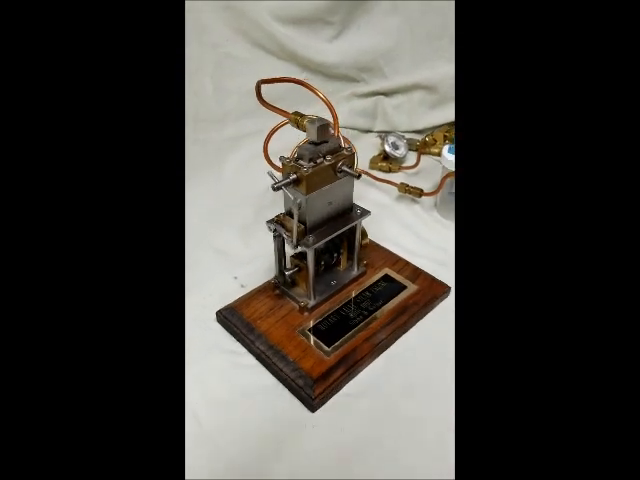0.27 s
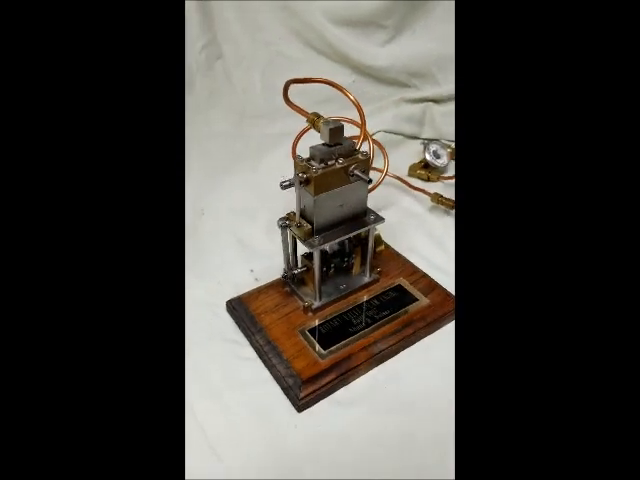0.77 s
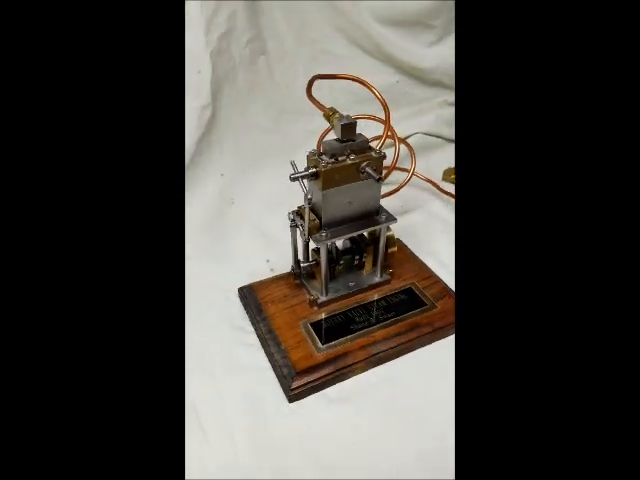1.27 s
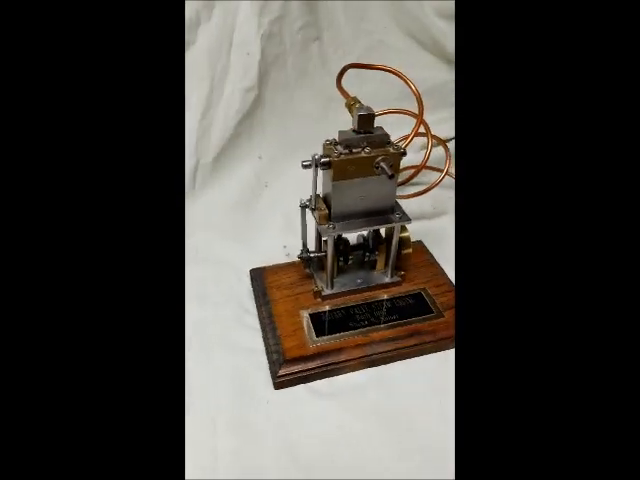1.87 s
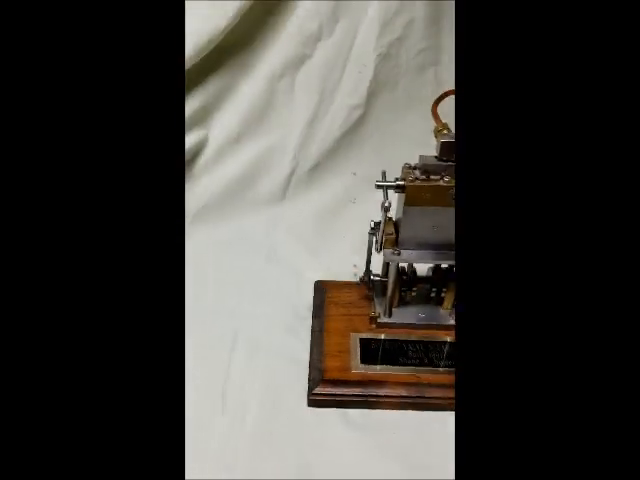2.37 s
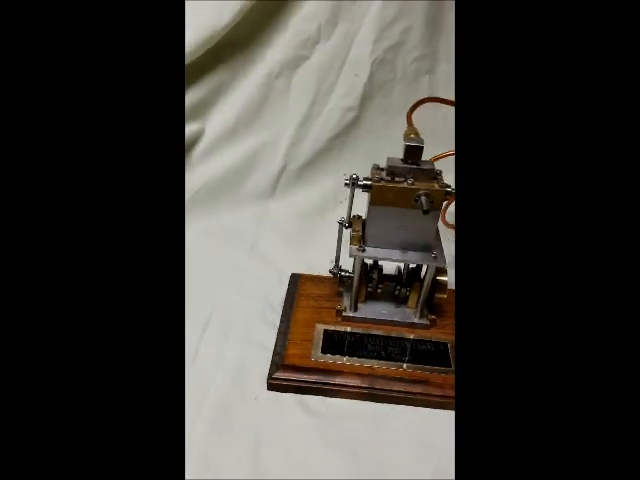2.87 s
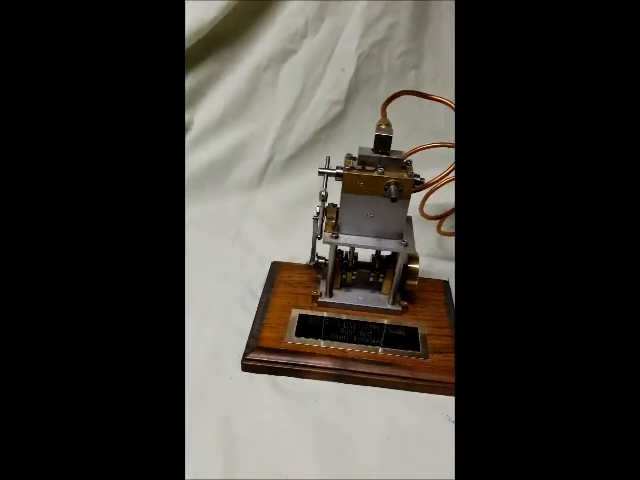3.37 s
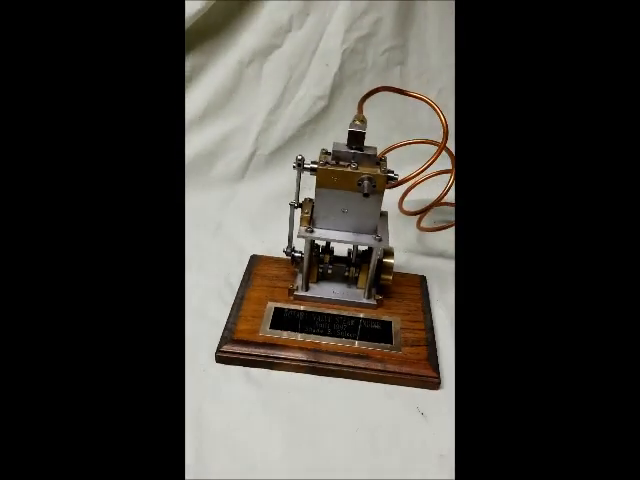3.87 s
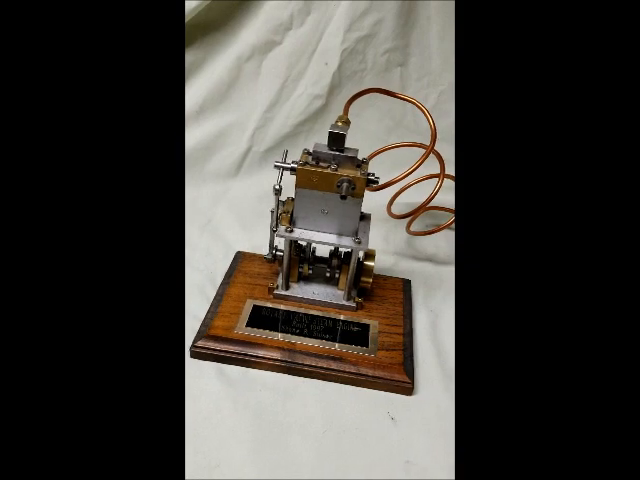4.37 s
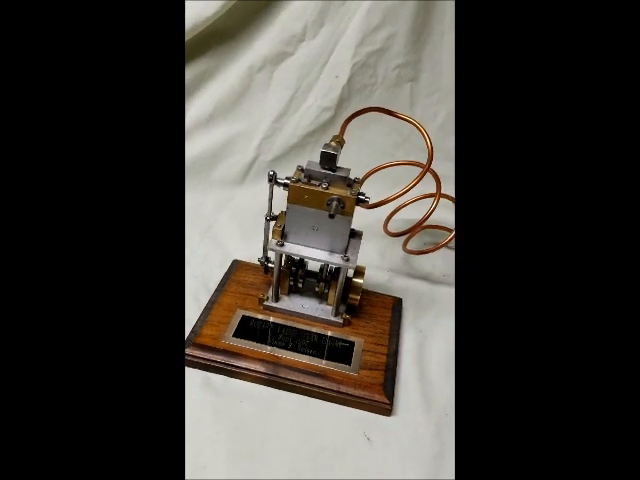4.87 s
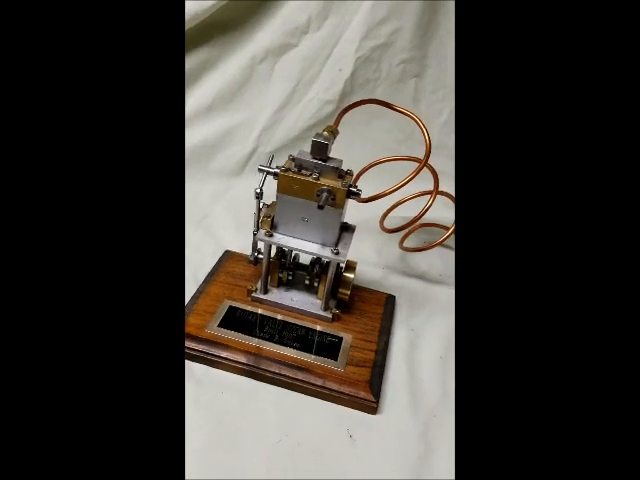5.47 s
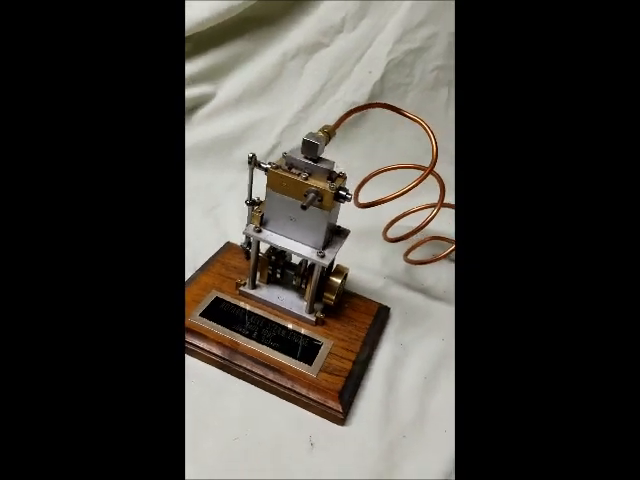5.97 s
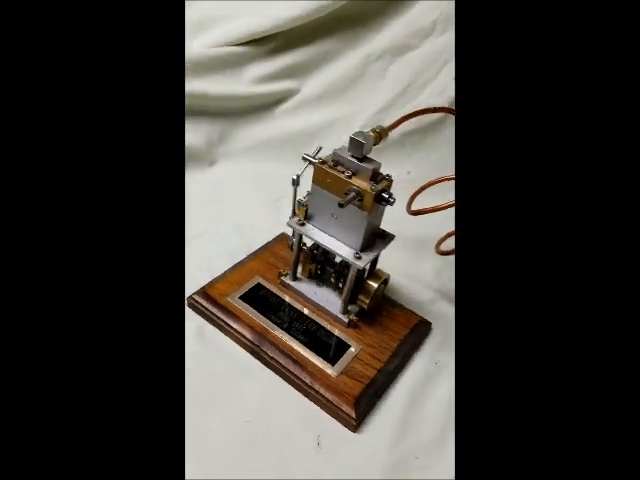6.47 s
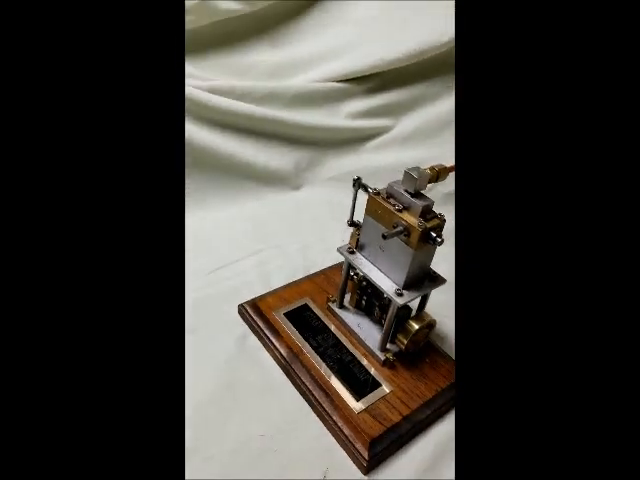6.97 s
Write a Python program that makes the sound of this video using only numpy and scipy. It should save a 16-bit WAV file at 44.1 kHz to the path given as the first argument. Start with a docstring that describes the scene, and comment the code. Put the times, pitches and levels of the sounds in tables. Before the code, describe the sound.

From 0 to about 7 seconds a small twin-cylinder compressed-air engine is already running and never stops, turning evenly about nine times a second with only tiny drift. Each turn starts with a hard knock ringing the metal frame and wooden base, then a short airy puff, a crisp double tick from the linkage, and another puff with a brief wavering whistle near 3 kHz. The base buzzes roughly after each knock. Loose pins rattle, air leaks softly, and a compressor hums faintly near 59 Hz. The phone circles closely: around 1.5-3 seconds very high, piercing jet hiss swells, strongest to the left; from about 3 seconds it recedes and knocks and ticks grow clearer, more central or rightward, through 6 seconds. At 6.4 seconds there is one very short scrape. The room is small and dry, with a short dull tail.

```python
"""A small twin-cylinder air engine turns nine times a second on a wooden base while a phone moves slowly around it.
Throughout, air leaks, loose pins rattle and a compressor motor hums further off.
Each turn starts with a knock that rings frame, base and table; then the second cylinder puffs a jet of noise
with pipe notes, the linkage ticks, and the first cylinder puffs with a short whistle.
Near 6.4 s something scrapes once, as a burst of resonant noise."""
import sys
import numpy as np
from scipy import signal
from scipy.fft import rfft, irfft, next_fast_len
from scipy.io import wavfile
from scipy.ndimage import uniform_filter1d

SR = 44100
rng = np.random.default_rng(int(sys.argv[2]) if len(sys.argv) > 2 else 0)


def undo_db(level):
    """Turn decibels back into plain size, where 20 dB means ten times bigger."""
    steps = np.asarray(level, float) / 20
    return 10 ** steps


def output_pcm(signal):
    """Save a mono or channel-first signal as 16-bit PCM at the path in sys.argv[1].

    Samples are clipped to [-1, 1] before scaling.
    """
    pcm = np.clip(np.atleast_2d(signal).T, -1, 1) * 32767
    wavfile.write(sys.argv[1], SR, np.round(pcm).astype(np.int16))


N = 317961
T = np.arange(N) / SR

# The phone's path. Each row: time in seconds, bearing from the engine's front in degrees,
# bass swell near the table in dB, delay of shared noise at the right port in ms.
PHONE = [(0, -50, 0, .2), (1.2, -33, -1.3, .15), (2.2, -19, -1.2, .5), (3.2, -5, -1, .48),
         (5, 20, -.5, .45), (6, 34, .5, .34), (7.2, 51, 2, .2)]
BEARING = np.interp(T, *np.transpose(PHONE)[:2])
# The lobe in which each part sends out its sound. Each entry: level outside the lobe in dB,
# change inside in dB, aim in degrees, half width in degrees, edge steepness (exponent).
LOBES = {"jet": (-26.3, 4.6, -21.5, 11.3, 12), "jet core": (-42, 15, -21.5, 11.3, 12),
         "upper note": (-33.5, 7, 5, 19, 3), "lower note": (-37, 5, 18, 34, 4), "ping": (-40, 8, -30, 9, 3),
         "mid hiss": (-44, -5, 7, 17, 3), "second hiss": (-2.5, -2.5, 25, 55, 4),
         "second notes": (-3.5, -6, -6, 36, 4), "knock": (-34, 11, 25, 42, 4),
         "tick": (-31, 6.5, 28, 46, 4), "base upper": (-41.5, 6, -19, 14, 3),
         "base lower": (-36, 3.4, 22, 44, 6)}
# Resonances of the exhaust jet. Each row: centre in Hz, width in Hz, relative level in dB.
JET = [(13400, 2100, -22), (12780, 1540, -8.5), (13770, 300, 5.5), (14740, 640, 5), (11500, 8700, -11)]
# When the first and the second cylinder open their valves [ms after the knock].
VALVE_OPENS_MS = (72.5, 21.8)
JET_ALIKE = .55  # correlation of the jet noise between the ports, 0-1


def level(x, db):
    """Scale to an rms level."""
    return x * undo_db(db) / np.sqrt(np.mean(x ** 2))


def columns(rows):
    """Curves at every sample."""
    s, *cols = np.transpose(rows)
    return [np.interp(T, s, c) for c in cols]


def sides(db, pan_db):
    """Left and right gains that share a level; pan_db is left minus right."""
    share = 1 / (1 + undo_db(-2 * pan_db))
    return undo_db(db) * np.sqrt(2 * np.array([share, 1 - share])).reshape(2, -1)


def lobe(part):
    """How far the phone stands inside a part's flat-topped lobe, 0-1."""
    aim, width, steep = LOBES[part][2:]
    return np.exp(-np.abs((BEARING - aim) / width) ** steep)


def heard_db(part):
    """Level of a part at the phone's bearing."""
    return LOBES[part][0] + LOBES[part][1] * lobe(part)


def heard(part):
    """Left and right gains of a part at the phone's bearing."""
    # Left minus right. Each entry: dB from the side, dB added before the open frame,
    # dB added in the jet's beam.
    pans = {"jet": (7.5, -3.5, 6), "jet core": (8, -3.5, 5), "upper note": (5.5, -6.5, -2),
            "lower note": (11, -17, 9), "knock": (2, -12.5, -1), "tick": (-4, -6, -3),
            "base upper": (10, -12, .1), "base lower": (11, -7, -1), "ping": (11, -17, 9),
            "mid hiss": (5.5, -6.5, -2)}
    side_db, front_db, beam_db = pans[part]
    return sides(heard_db(part), side_db + front_db * lobe("knock") + beam_db * lobe("jet"))


def ring(x, hz, t60):
    """One decaying mode, peak near 1 after a unit blow; t60 in seconds."""
    r, w = np.exp(-np.log(1000) / (t60 * SR)), 2 * np.pi * hz / SR
    return signal.lfilter([0, np.sin(w)], [1, -2 * r * np.cos(w), r * r], x)


def air(alike):
    """Noise at both ports: partly the same sound arriving later on the right."""
    a, b = rng.standard_normal((2, N))
    alike = np.clip(alike, 0, 1)
    delay = np.round(columns(PHONE)[2] * SR / 1000).astype(int)
    late = np.clip(np.arange(N) - delay, 0, N - 1)
    return np.array([a, alike * a[late] + np.sqrt(1 - alike ** 2) * b])


def shaped(x, gain):
    """Filter by a gain that is a function of frequency; rms 1."""
    size = next_fast_len(N)
    hz = np.arange(size // 2 + 1) * SR / size + 1  # 1 Hz up, to stay clear of zero
    y = irfft(rfft(x, size) * gain(hz), size)[..., :N]
    return y / np.sqrt(np.mean(y ** 2, axis=-1, keepdims=True))


def resonant(x, peaks):
    """Noise through summed resonances, each half as strong at the edges of its width."""
    return shaped(x, lambda f: sum(undo_db(db) / (1 + (2 * (f - hz) / w) ** 2) for hz, w, db in peaks))


def flicker(rate, depth):
    """A gain that wanders at random in dB: rate in new values a second, depth scales the wander."""
    k = int(SR / rate)
    steps = np.repeat(rng.standard_normal(N // k + 1), k)
    return undo_db(depth * 2.2 * uniform_filter1d(steps, k)[:N])


def train(times, sizes):
    """Unit blows on the sample grid, scaled by their sizes."""
    i = np.round(times * SR).astype(int)
    keep = (i >= 0) & (i < N)
    return np.bincount(i[keep], sizes[keep], N)


def knock_times():
    """When each turn of the crank begins: an even beat that the crank leads or lags a little."""
    turn_hz, first_knock_s = 9.052, .0129
    # Drift of the crank. Each row: time in seconds, lag behind the even beat in ms.
    crank = [(0.24, 1.2), (0.68, 1.4), (1.12, 0.3), (2.44, -0.9), (3.2, -2.6), (3.9, -2.6), (5.98, 0.4),
             (6.87, 3.0)]
    even = first_knock_s + np.arange(-2, int(N / SR * turn_hz) + 2) / turn_hz
    return even + np.interp(even, *np.transpose(crank)) / 1000


def puff(ms):
    """Gain of one puff since the valve opened: swells to its peak, drops fast, then leaks away."""
    start_db, peak_ms = -26, 8.2
    drop_ms = 5.8  # the burst is 3 dB down this long after the peak
    tail_db, tail_db_per_ms = -11, -0.4492
    early, late = np.maximum(1 - ms / peak_ms, 0), np.maximum(ms - peak_ms, 0)
    burst = .5 ** ((late / drop_ms) ** 2 / 2)
    tail = undo_db(tail_db + tail_db_per_ms * late)
    return undo_db(start_db * early ** 2) * np.hypot(burst, tail)


def exhaust(turns):
    """Two puffs a turn: ragged jet noise, with two pipe notes blown by the same air."""
    # Noise bands of the exhaust: two pipe notes, a core heard mainly down the stream, and a hiss
    # alike from both cylinders. Each row: centre in Hz, width in Hz, relative level in dB.
    upper_note = [(7320, 630, 12.5), (8066, 1260, 17.5), (7350, 9900, -53)]
    lower_note = [(3150, 510, 4.5), (3740, 3100, -3)]
    jet_core = [(12160, 450, -5), (15200, 990, 0.5)]
    mid_hiss = [(6400, 3700, .1)]
    puffs = []
    for opens in VALVE_OPENS_MS:
        late, loud = rng.standard_normal((len(turns), 2)).T
        start = turns + (opens + .5 * late) / 1000  # 0.5 ms scatter
        k = np.searchsorted(start, T) - 1
        puffs.append(puff((T - start[k]) * 1000) * undo_db(1.2 * loud[k]))  # 1.2 dB scatter
    # the second cylinder has its own levels for hiss and notes
    hiss = np.hypot(puffs[0], undo_db(heard_db("second hiss")) * puffs[1])
    notes = np.hypot(puffs[0], undo_db(heard_db("second notes")) * puffs[1])
    jet = resonant(air(JET_ALIKE), JET) * flicker(700, 1.1) * hiss * heard("jet")
    core = resonant(air(JET_ALIKE), jet_core) * flicker(500, 0.49) * hiss * heard("jet core")
    upper = resonant(air(JET_ALIKE), upper_note) * flicker(300, 0.33) * notes * heard("upper note")
    lower = resonant(air(JET_ALIKE), lower_note) * flicker(210, 0.49) * notes * heard("lower note")
    mid = resonant(air(JET_ALIKE), mid_hiss) * np.hypot(*puffs) * heard("mid hiss")
    return jet + core + upper + lower + mid


def ping(turns):
    """The first port whistles briefly, wavering and sagging as the pressure falls."""
    base_hz, scatter_hz, sag_hz_per_ms = 3294, 88.9, 8.2
    wobble_hz = 50  # pitch shift per neper of random wander
    pitch, loud = rng.standard_normal((len(turns), 2)).T
    start = turns + VALVE_OPENS_MS[0] / 1000
    k = np.searchsorted(start, T) - 1
    ms = (T - start[k]) * 1000
    hz = base_hz + scatter_hz * pitch[k] - sag_hz_per_ms * ms
    hz = hz + wobble_hz * np.log(flicker(600, 8.7))  # turbulence shakes the pitch
    whistle = np.sin(2 * np.pi * np.cumsum(hz) / SR)
    # the squared puff keeps the whistle to the height of the burst
    return whistle * puff(ms) ** 2 * undo_db(1.5 * loud[k]) * flicker(350, 1.8) * heard("ping")


def struck(times, db, modes, scatter_db, count=3):
    """Blows ring every mode a little differently; one mode in count reaches the ports in opposite phase."""
    # Bearings at which the modes' levels are given [deg].
    bearings = (-45, -25, -5, 20, 45)
    out, bearing = np.zeros((2, N)), np.interp(times, *np.transpose(PHONE)[:2])
    for k, (hz, t60, pan_db, *pattern_db) in enumerate(modes):
        mode_db = np.interp(bearing, bearings, pattern_db)
        scatter = scatter_db * rng.standard_normal(len(times))
        x = ring(train(times, undo_db(db + mode_db + scatter)), hz, t60)
        left_sign = -1 if k % count == count - 1 else 1
        # neighbouring modes start in opposite directions, which softens the front
        out += (-1) ** k * x * sides(0, pan_db) * np.array([[left_sign], [1]])
    return out


def linkage(turns):
    """Knock and tick ring the metal frame and the wooden base; loose pins rattle throughout."""
    # Modes of the frame and of the base. Each row: pitch in Hz, t60 in seconds,
    # left minus right in dB, then the level in dB at each of five bearings.
    frame = [(1642, 0.022, -14, -12, -11, -25, -8.5, -5), (2104, 0.021, -8, -11, -9.5, -5.5, -4, -1.5),
             (2131, 0.019, -9, 4, 4, -2, -0.5, 5), (2292, 0.012, 13, -37, 4.5, 3, 2, 3.5),
             (2273, 0.023, -32, 2.5, 7, 0, 0, 1.5), (2220, 0.0073, -7.5, 9.5, 13, 9.5, 8, 11),
             (2518, 0.02, 1.5, -5, -5, -4.5, -21, -7), (2653, 0.04, 6, -24, -21, -29, -9.5, -10),
             (3600, 0.0047, -0.5, -16, -18, 0, 1.5, -1.5), (2980, 0.0027, 9, 2, -1, 1, -6, -15),
             (4000, 0.013, 19, -8, -4, 1, 4, -9), (4490, 0.0092, 21, -4, 5.5, -9, -1.5, -11),
             (5330, 0.00079, 14, -12, 4, 1, -2, 12)]
    base_upper = [(980, 0.038, -15, 6.5, 1, 1.5, -2, -2), (1161, 0.029, -19.5, 2, 1.5, -29, -22.5, 1),
                  (1186, 0.033, 1.5, 2, -3, -7, -27, -3), (1228, 0.027, -9.8, 0.5, 4, -2, 9, 7),
                  (1343, 0.027, -3, -11, 5, 7, 7, 6), (1544, 0.031, -6, -10, -3, -11, 6, 5)]
    base_lower = [(455, .07, .1, -12, -12, -14, -14, -8), (530, .06, .1, -5, -7, -7, -13, -13),
                  (580, .045, .1, -5, -6, -3, -7, -9), (615, .035, .1, -9, -9, -5, -8, -11),
                  (654, .04, .1, -9, -7, -6, -7, -4), (700, .035, .1, -8, -5, -5, -8, -7),
                  (770, .06, .1, -8, -10, -9, -14, -20), (845, .05, .1, -8, -14, -10, -5, -3)]
    # Blows from play in the linkage each turn. Each row: ms after the knock,
    # level on the frame in dB, level on the base in dB, timing scatter in ms.
    knock = [(-1.4, -2, -2, .03), (-.5, 0, -30, .03), (3.5, -20, -6, .7), (10.5, -11, -9, .5),
             (42.5, -13, -12, .6)]
    tick = [(51.5, -9, -14, .4), (62.2, -2, -8, .1), (63.1, -3, -30, .1), (67, -15, -16, .8),
            (71, -15, -18, 1.2)]
    blow_scatter_db, spit_db, rattle_db = 1.1, -12, -27
    tick_thud_db = -3.5  # the lighter tick hardly moves the lower modes of the base
    one_sided_hz = 487  # below this the blows are alike at both ports
    times, frame_db, base_db = [], [], []
    for rows in (knock, tick):
        ms, on_frame, on_base, scatter = np.transpose(rows)
        late_ms = ms + scatter * rng.standard_normal((len(turns), len(ms)))
        times.append((turns[:, None] + late_ms / 1000).ravel())
        frame_db.append(np.tile(on_frame, len(turns)))
        base_db.append(np.tile(on_base, len(turns)))
    out = struck(times[0], frame_db[0], frame, blow_scatter_db) * heard("knock")
    out += struck(times[1], frame_db[1], frame, blow_scatter_db) * heard("tick")
    both = np.concatenate(times)
    upper_db = np.concatenate(base_db)
    lower_db = np.concatenate([base_db[0], base_db[1] + tick_thud_db])
    out += struck(both, upper_db, base_upper, blow_scatter_db) * heard("base upper")
    out += struck(both, lower_db, base_lower, blow_scatter_db) * heard("base lower")
    # the tick also spits a short crack of treble, with a decay constant of 2.2 ms
    spit = train(times[1], undo_db(frame_db[1] + spit_db))
    spit = signal.lfilter([1], [1, -np.exp(-1 / (0.0022 * SR))], spit)
    out += spit * resonant(air(JET_ALIKE), JET + [(9700, 7400, 42)]) * heard("jet")
    # 900 random pin blows a second, most of them small
    when, size = rng.random((int(900 * N / SR), 2)).T
    rattle = struck(when * N / SR, -3.5 * np.log(size + .02), frame, 2.5)
    out += level(rattle, rattle_db) * heard("tick")
    side = (out[0] - out[1]) / 2
    high = signal.butter(2, one_sided_hz, "high", fs=SR, output="sos")
    long_waves = side - signal.sosfilt(high, side)
    return out - long_waves * np.array([[1], [-1]])


def rumble(turns):
    """The base buzzes on the cloth after each knock: rough noise that dies away until the next."""
    # Buzz resonances. Each row: centre in Hz, width in Hz, relative level in dB.
    buzz = [(648, 74, 9), (900, 340, -8.5), (1320, 910, -10), (1930, 270, -8.5)]
    start_db, t60_ms = -5.5, 225  # level before the gain of the base's lower modes
    ms = (T - turns[np.searchsorted(turns, T) - 1]) * 1000
    fade = undo_db(start_db - 60 * ms / t60_ms)
    return resonant(air(0.23), buzz) * fade * flicker(200, 1.35) * heard("base lower")


def scrape():
    """A brief rough scrape nearby: resonant noise with attack, hold and release."""
    start_s, attack_ms, hold_ms, t60_ms, hold_db = 6.438, 2, 13.5, 38, -23.5
    # centre Hz, width Hz, relative dB
    peaks = [(400, 66, -7), (700, 300, -6), (1290, 300, 4), (1720, 300, -1), (2400, 900, -10)]
    body = resonant(air(0.31), peaks)
    ms = (T - start_s) * 1000
    fade_db = -60 * np.maximum(ms - attack_ms - hold_ms, 0) / t60_ms
    return body * np.clip(ms / attack_ms, 0, 1) * undo_db(hold_db + fade_db)


def table(turns):
    """Regular pushes ring the slow modes of the table, so multiples of the turn stand out as lines."""
    # Table modes. Each row: pitch in Hz, signed share, t60 in seconds.
    modes = [(55.3, 0.93, 0.61), (62.3, -1.0, 0.5), (71.5, -0.25, 0.6), (99.8, -0.22, 0.55),
             (118.7, 0.31, 0.61), (154.7, 0.58, 0.61), (172.4, -0.88, 0.34), (221.0, -0.39, 0.58),
             (237.5, 0.82, 0.61), (314.4, 0.85, 0.24), (333.3, 0.41, 0.29), (358.3, -0.28, 0.61),
             (374.4, -0.19, 0.61)]
    # The blows push the whole engine on the table. Each row: ms after the knock, signed push.
    pushes = [(-2.0, 1), (25.5, 0.5), (61.2, -0.35)]
    ms, push = np.transpose(pushes)
    times = (turns[:, None] + ms / 1000).ravel()
    scatter = undo_db(.5 * rng.standard_normal(len(times)))
    x = train(times, np.tile(push, len(turns)) * scatter)
    return level(sum(share * ring(x, hz, t60) for hz, share, t60 in modes), -46)


def hum():
    """A compressor motor just under mains speed: steady sine partials."""
    # Each row: pitch in Hz, rms level in dB before the bass swell and pan, phase in radians.
    partials = [(58.817, -41.56, .35), (117.63, -61.56, 0.1)]
    return sum(undo_db(db) * np.sqrt(2) * np.cos(2 * np.pi * hz * T + start) for hz, db, start in partials)


def floor():
    """Leaking air and the quiet room: shaped noise, most alike at both ports in the bass."""
    # Spectrum of the floor. Each row: frequency in Hz, relative density in dB per Hz.
    spectrum = [(30, -14), (60, -11), (110, -14), (220, -16), (420, -16.5), (700, -23.5), (1100, -25.5),
                (2200, -14), (3400, -16), (5500, -24.5), (7900, -23.5), (10500, -32), (14500, -16),
                (16500, -34)]
    hz, db = np.transpose(spectrum)
    mid, side = rng.standard_normal((2, N))
    side = shaped(side, lambda f: 1 / (1 + (600 / f) ** 2) + 0.22)  # less width in the bass
    both = mid + side * np.array([[1], [-1]])
    return shaped(both, lambda f: undo_db(np.interp(np.log(f), np.log(hz), db))) * undo_db(-41)


def room(x):
    """Cloth and walls return a short dull tail, different at each port."""
    t = np.arange(int(.3 * SR)) / SR
    tail = rng.standard_normal((2, len(t))) * undo_db(-60 * t / 0.067) * (t > .003)  # t60 67 ms, 3 ms gap
    tail = tail / np.sqrt(np.sum(tail ** 2, axis=1, keepdims=True))
    tail = signal.lfilter([1], [1, -.4], tail)  # dulls the treble
    return signal.fftconvolve(x.mean(0)[None], tail, axes=1)[:, :N] * undo_db(-10.0)


def scene():
    """Engine, table and room at the two ports."""
    turns = knock_times()
    engine = exhaust(turns) + ping(turns) + linkage(turns) + rumble(turns) + scrape()
    bass = (table(turns) + hum()) * sides(columns(PHONE)[1], 2.2)
    return engine + room(engine) + bass + floor()


def top_cut(x):
    """Nothing passes above 16.98 kHz."""
    return signal.sosfilt(signal.butter(12, 16980, fs=SR, output="sos"), x)


def record(dry):
    """The phone cuts the top steeply above 15.85 kHz."""
    steep = signal.ellip(10, .2, 60, 15850, fs=SR, output="sos")
    mix = signal.sosfilt(steep, dry)
    return top_cut(mix)


dry = scene()
out = record(dry)
output_pcm(out)
```